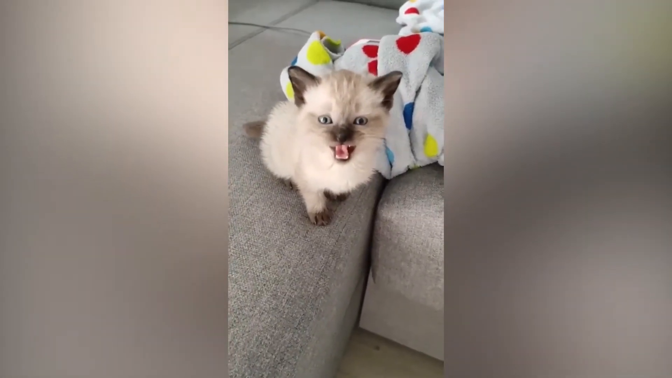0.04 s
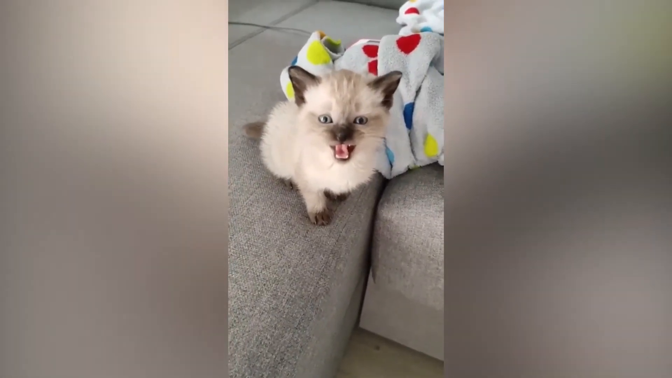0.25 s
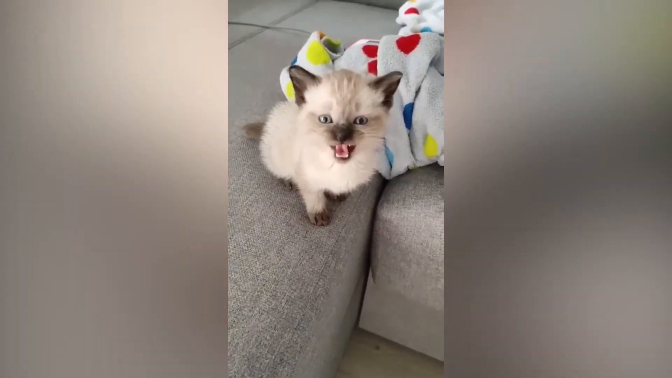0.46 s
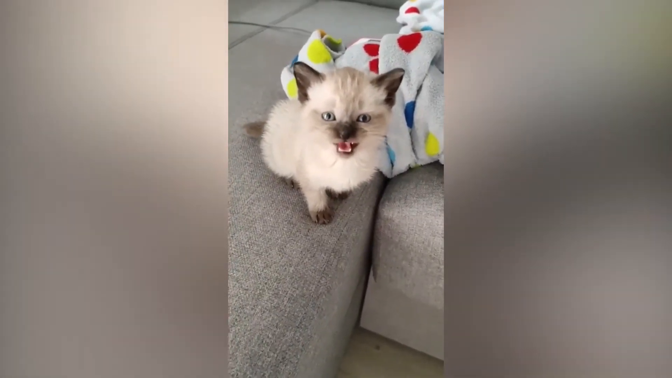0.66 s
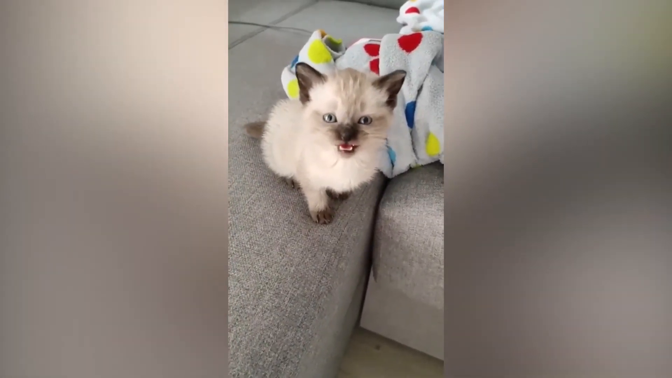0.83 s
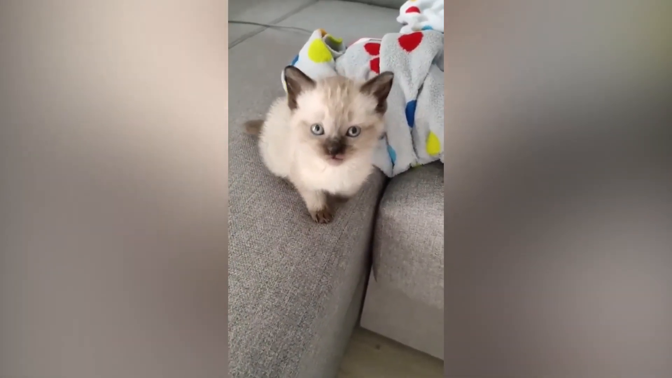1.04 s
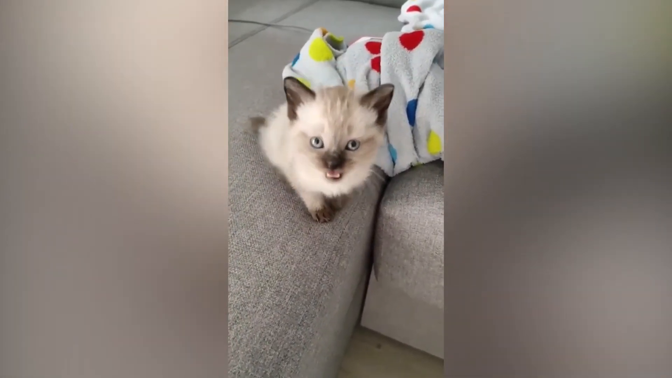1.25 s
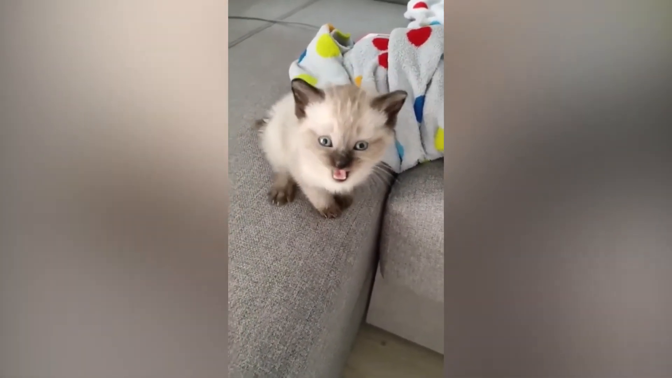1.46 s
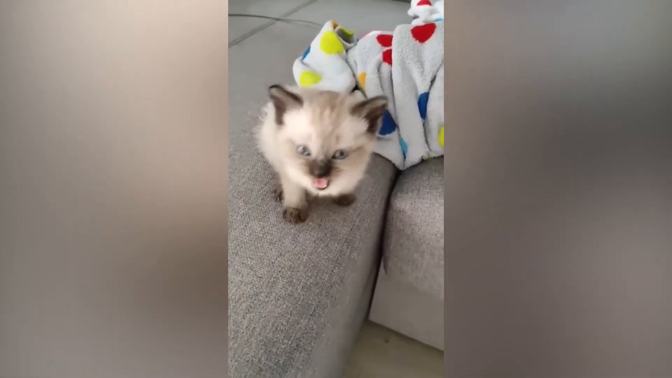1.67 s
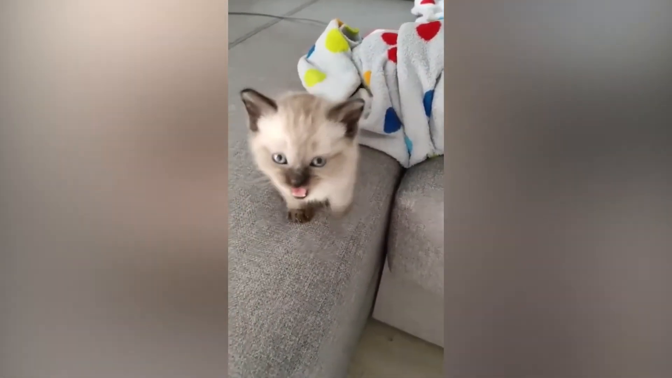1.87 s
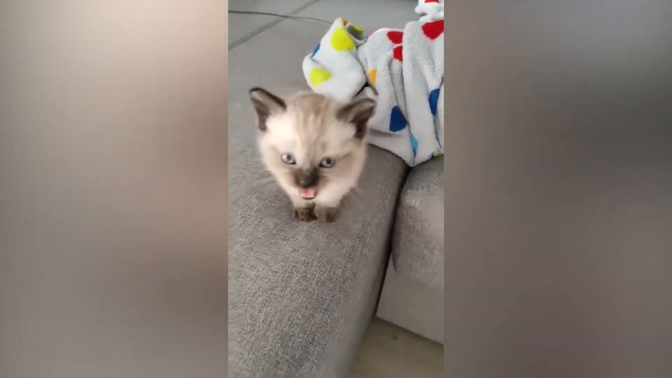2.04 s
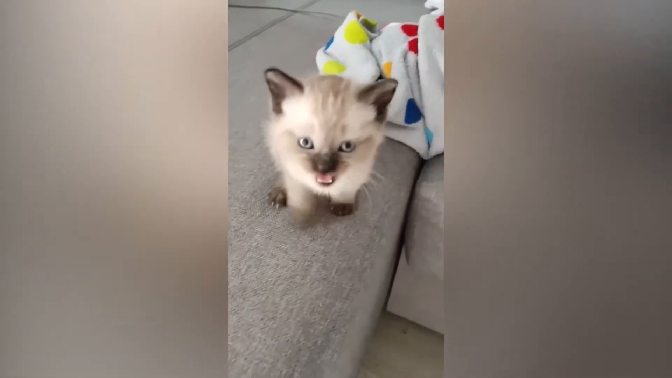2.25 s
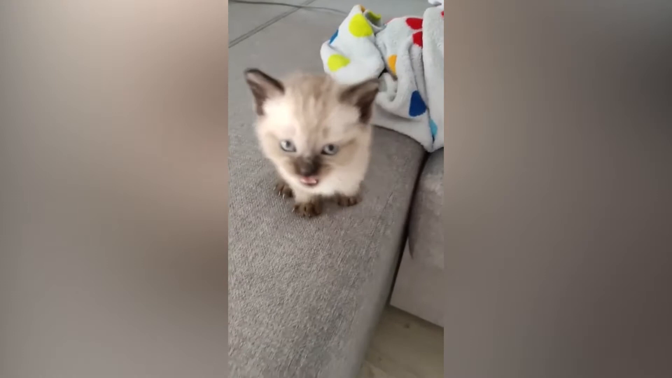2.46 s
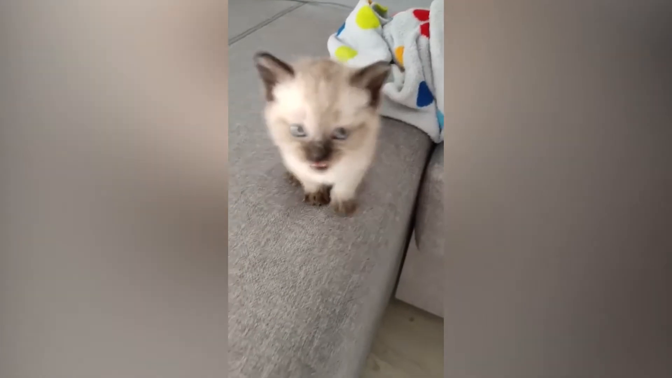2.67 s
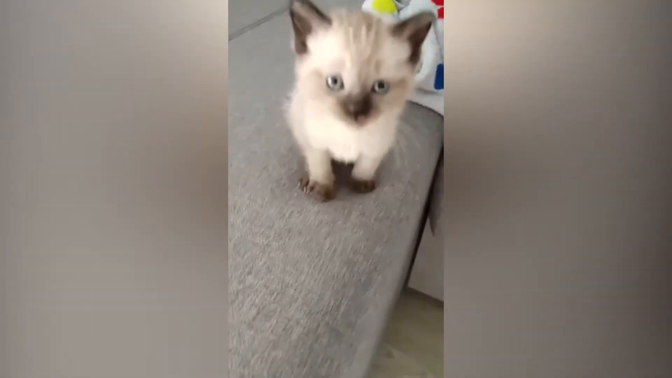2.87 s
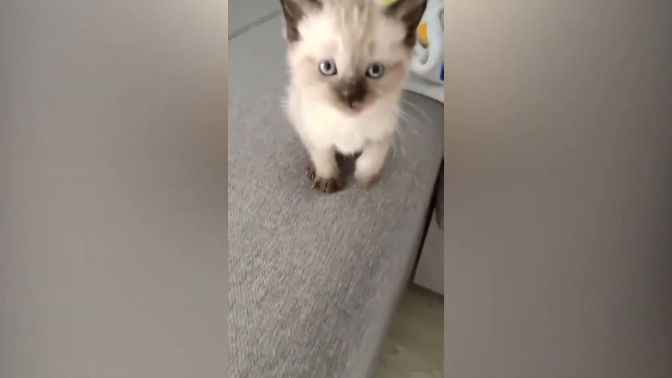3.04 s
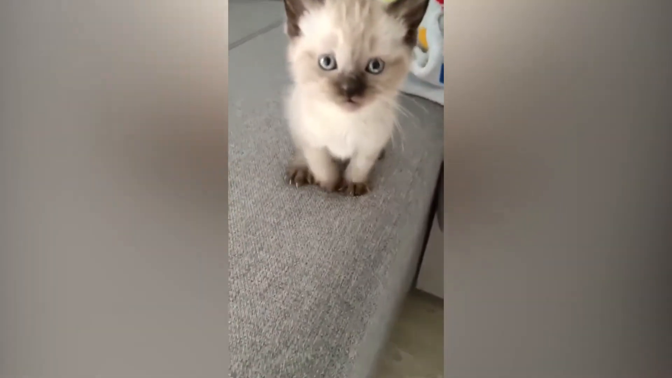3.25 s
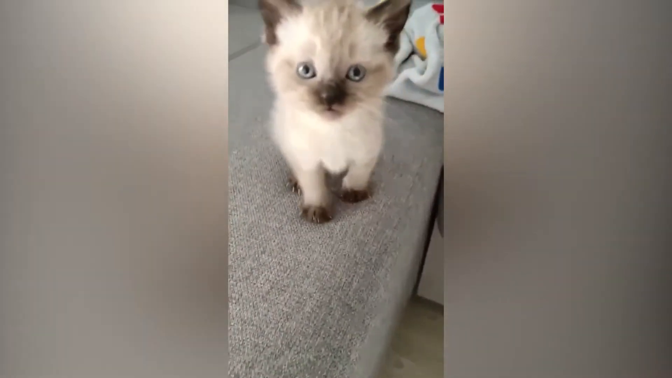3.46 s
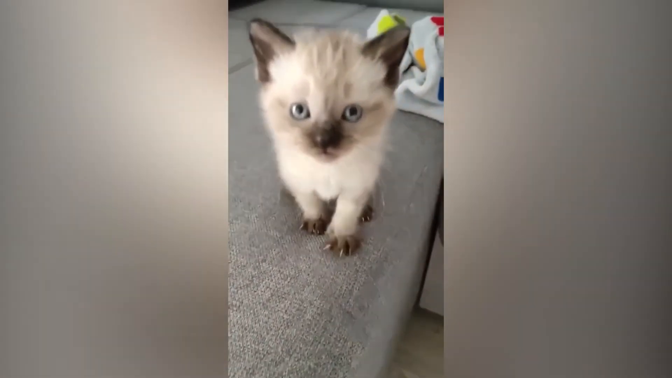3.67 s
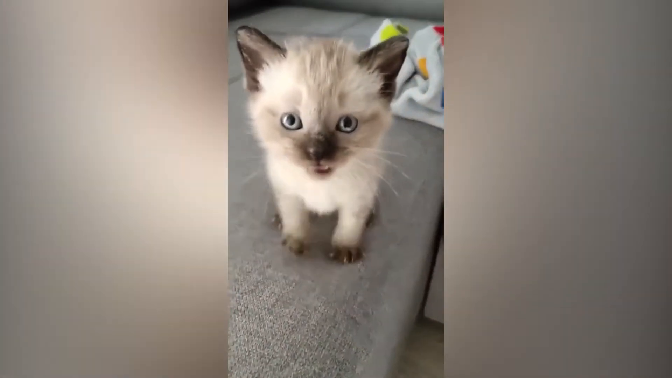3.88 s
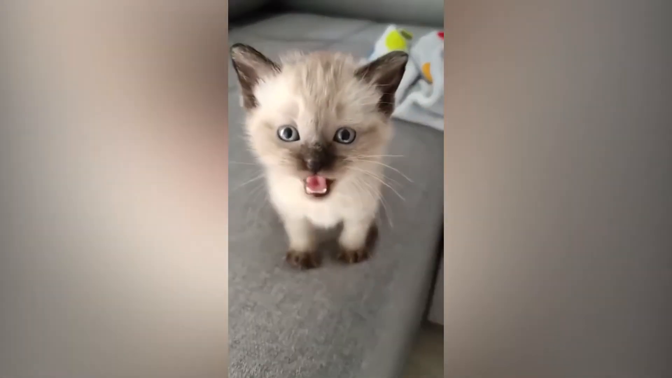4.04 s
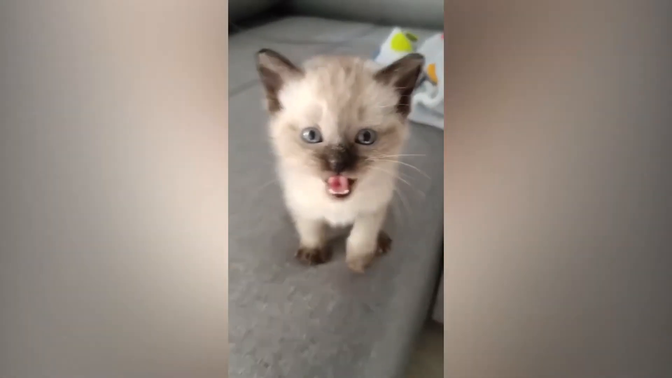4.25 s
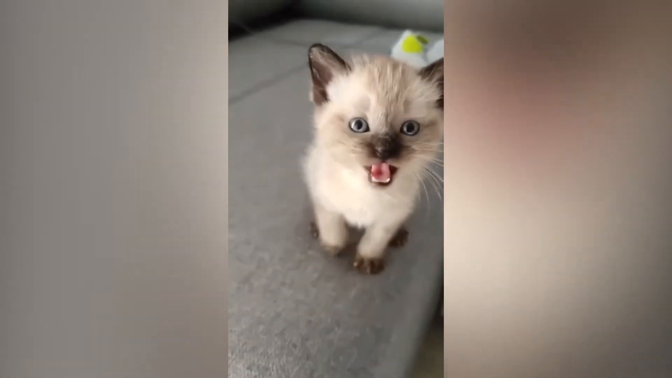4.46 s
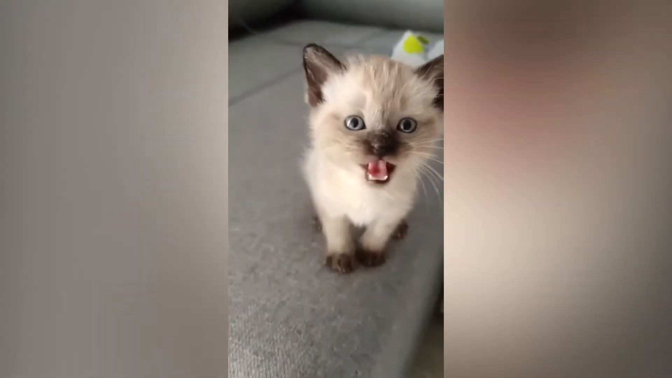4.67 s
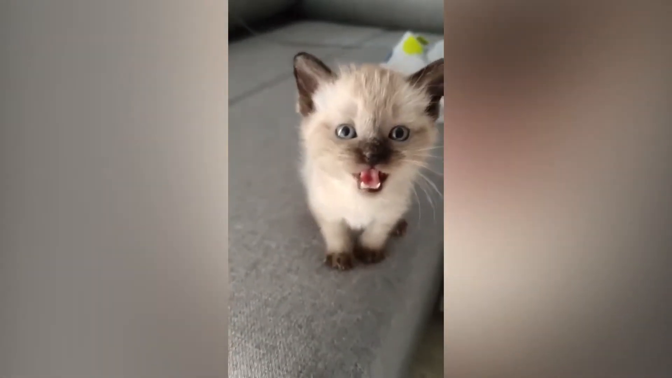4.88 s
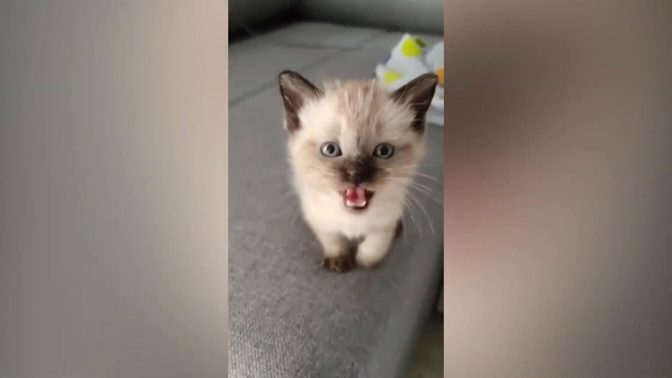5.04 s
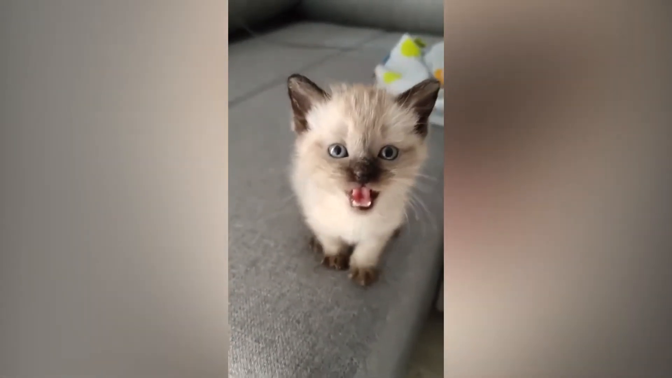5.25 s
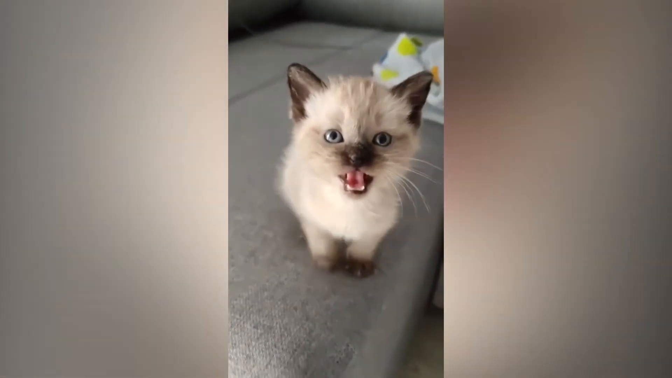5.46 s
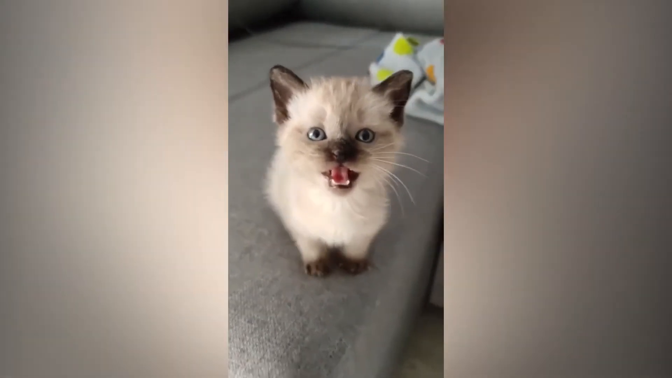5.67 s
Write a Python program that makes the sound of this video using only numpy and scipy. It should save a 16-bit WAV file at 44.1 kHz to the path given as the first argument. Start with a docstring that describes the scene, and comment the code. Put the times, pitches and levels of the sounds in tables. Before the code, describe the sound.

A small kitten meows close to the microphone in a quiet living room, with a faint low rumble and slight reverberation. The first meow is already under way at the start, a soft, drawn-out call that lifts a little in pitch around 1.2 seconds and then slowly sinks and weakens. It turns hoarse and raspy from about 2 to 2.8 seconds, clears briefly, and dies in a tiny creak at 3.4 seconds. Only room tone fills the short pause. At about 4.1 seconds the second meow begins with a brief rasp, then becomes higher and cleaner than the first. It rises gently and swells, loudest from around 4.9 seconds, and carries on to the end at about 5.7 seconds. Two faint, thin, flickering high tones accompany it, from 4.2 to 4.5 seconds and, slightly lower, from 4.8 to 5.2 seconds.

```python
"""A small kitten on a sofa gives two long meows, close by, over the tone of a quiet living room.
The first, already under way, sinks in pitch, turns hoarse and dies in a creak as the folds go slack.
The second is higher, louder and cleaner, with two thin, flickering tones near 4 kHz alongside it.
Both meows follow the source-filter principle: the vocal folds buzz and chop the breath, the throat
and open mouth resonate, and the room adds a faint reverberation."""
import sys
import numpy as np
from scipy import signal
from scipy.fft import rfft, irfft
from scipy.io import wavfile

SR = 44100
rng = np.random.default_rng(int(sys.argv[2]) if len(sys.argv) > 2 else 0)


def digitize_waveform(pressure):
    """Quantize a signal to 16-bit integers and store it at the path in sys.argv[1].

    Rows of a 2-D input are taken as channels; values are limited to [-1, 1].
    """
    field = np.atleast_2d(pressure).T
    bounded = np.clip(field, -1, 1)
    quanta = np.round(bounded * 32767).astype(np.int16)
    wavfile.write(sys.argv[1], SR, quanta)


N = 251811
STEP = 32   # samples per tick of the control clock
TIME = np.arange(N) / SR
TICKS = TIME[::STEP]
CUTOFF_HZ = 7800


def from_db(db):
    return 10 ** (np.asarray(db) / 20)


def rms_one(x):
    return x / np.sqrt(np.mean(x ** 2) + 1e-20)


def control_curve(points):
    return np.interp(TICKS, *np.transpose(points))


def audio_rate(control):
    return np.interp(TIME, TICKS, control)


def gain_at(spectrum, hz):
    points_hz, levels_db = np.transpose(spectrum)
    return from_db(np.interp(np.log(hz), np.log(points_hz), levels_db))


def drift(rate_hz, count=1):
    """Low-passed noise: rows of smooth random motion on the control clock, rms 1."""
    pole = np.exp(-2 * np.pi * rate_hz * STEP / SR)
    white = rng.standard_normal((count, 2 * len(TICKS)))
    slow = signal.lfilter([1], [1, -2 * pole, pole * pole], white)
    return rms_one(slow[:, len(TICKS):])


def coloured(noise, spectrum):
    """Spectral shaping: noise takes on the given envelope, rms 1."""
    hz = np.maximum(np.arange(N // 2 + 1) * SR / N, 1)
    return rms_one(irfft(rfft(noise) * gain_at(spectrum, hz), N))


# Background spectrum: frequency_hz, relative_density_db
ROOM_SPECTRUM = [(10, -1), (20, -12.5), (38, -19), (100, -24), (213, -26.5), (450, -32), (1150, -36.5),
                 (2100, -41), (3900, -42.5), (4500, -51), (5500, -42.5), (7000, -48), (7800, -54)]
def room_tone(level_db=-68.5):
    """Stationary noise: a faint rumble, strongest in the bass."""
    return from_db(level_db) * coloured(rng.standard_normal(N), ROOM_SPECTRUM)


def reverberation(sound, t60_s=0.63, level_db=-11):
    """Diffuse reflection: echoes from walls and furniture decay exponentially."""
    t = TIME[:SR // 2]
    tail = rng.standard_normal(len(t)) * from_db(-60 * t / t60_s) * (t > .004)
    return from_db(level_db) * signal.fftconvolve(sound, tail / np.linalg.norm(tail))[:N]


# Thin tones sounding alongside the second meow: start_s, end_s, pitch_hz, level_db
THIN_TONES = [(4.165, 4.52, 4196, -61.5), (4.773, 5.162, 3946, -58)]
def thin_tone(start_s, end_s, pitch_hz, level_db):
    """Amplitude modulation: a sine of steady pitch flickers in level."""
    gate = np.clip(np.minimum(TICKS - start_s, end_s - TICKS) / 0.02, 0, 1)
    envelope = gate * from_db(level_db + 3.8 * drift(36)[0])
    return audio_rate(envelope) * np.sin(2 * np.pi * pitch_hz * TIME)


# Last closures of the folds: time_s, strength_db
FOLD_SLAPS = [(3.3727, -53.5), (3.3805, -54), (3.395, -57)]
# Throat resonances: frequency_hz, gain_db, t60_s
THROAT_MODES = [(230, -5, 0.053), (1660, 3, .005), (2950, 17.5, 0.006), (3750, -16, 0.0057)]
def creak(closing_s=0.00072):
    """Impulse response: each soft slap of the slack folds rings the damped modes of the throat."""
    t = TIME[:SR // 20]
    ring = sum(from_db(db - 60 * t / t60) * np.sin(2 * np.pi * hz * t) for hz, db, t60 in THROAT_MODES)
    slaps = np.zeros(N)
    for time_s, strength_db in FOLD_SLAPS:
        slaps[round(time_s * SR)] = from_db(strength_db)
    return signal.fftconvolve(slaps, ring * (1 - np.exp(-t / closing_s)))[:N]


def mouth_rasp(centre_hz, width_hz=510):
    """Narrow-band noise: turbulence rings in the moving resonance of the mouth."""
    angle = 2 * np.pi * np.cumsum(audio_rate(centre_hz)) / SR
    in_phase, quadrature = drift(width_hz, count=2)
    return audio_rate(in_phase) * np.cos(angle) + audio_rate(quadrature) * np.sin(angle)


# Turbulence at the folds, per meow: frequency_hz, relative_density_db
BREATH_SPECTRA = [
    [(200, -31.5), (700, -26), (1200, -38), (1500, -24), (1800, -1), (2200, -1.5), (2500, -4.5),
     (3000, -5.5), (3600, -4.5), (4100, -11), (4600, -27.5), (5800, -23.5), (6600, -23.5), (8000, -57.5)],
    [(200, -27), (1200, -21), (1600, -20), (2000, -27), (2500, -22.5), (2900, -7), (3600, -0.5), (4100, -8),
     (4600, -28), (5800, -28.5), (6400, -39.5), (8000, -47)],
]
def throat_rasp(which, phase):
    """Modulated turbulence: air rushes through the folds once in every cycle."""
    puffs = rng.standard_normal(N) * (1 + 1.4 * np.cos(phase))
    return coloured(puffs, BREATH_SPECTRA[which])


def band(gains, hz, low_hz, high_hz, level_db):
    """Power normalisation: the partials between two steep borders share one total level."""
    weights = gains / np.sqrt((1 + (low_hz / hz) ** 60) * (1 + (hz / high_hz) ** 60))
    return weights / np.sqrt(np.sum(weights ** 2, axis=0) + 1e-12) * from_db(level_db)


def partials(sizes, phase, flutter_db, shift_hz=0):
    """Superposition: sinusoids one pitch apart add up, each fluttering in strength."""
    sizes = sizes * from_db(flutter_db * drift(33, count=len(sizes)))
    smear = rng.normal(0, 1.59, len(sizes))   # the tract smears each pulse
    live = slice(*np.flatnonzero(audio_rate(sizes.sum(axis=0)))[[0, -1]])
    tone = np.zeros(N)
    for k, size in enumerate(sizes):
        angle = (k + 1) * phase[live] + 2 * np.pi * shift_hz * TIME[live] + smear[k]
        tone[live] += np.sqrt(2) * audio_rate(size)[live] * np.cos(angle)
    return tone


# Envelope of the shrill partials, per meow: frequency_hz, relative_gain_db
SHRILL_SPECTRA = [
    [(3250, -22.5), (3450, 6), (3600, -5), (3780, 4.5), (4100, -6.5), (4450, -18), (4750, -24),
     (5050, -13.5), (5400, -15.5), (5750, -8.5), (6150, -27), (6450, -14), (6800, -53), (7800, -52)],
    [(3300, -5.5), (3600, 18.5), (3750, -13.5), (4100, 0), (4300, -21), (4550, -32.5), (5000, -22.5),
     (5450, -26.5), (5900, -22), (6250, -42.5), (6650, -32), (7100, -35.5), (7500, -50)],
]
def shrill_partials(which, harmonic_hz, phase, clear, shrill_db, sheen_db, shift_hz=2757):
    """Frequency shift: shrill partials above 3 kHz glide with the pitch but lie off its harmonic series."""
    hz = harmonic_hz + shift_hz
    gains = gain_at(SHRILL_SPECTRA[which], hz)
    sizes = band(gains, hz, 3300, 4500, shrill_db) + band(gains, hz, 4500, CUTOFF_HZ, sheen_db)
    return partials(sizes * clear, phase, flutter_db=1.6, shift_hz=shift_hz)


# Vocal tract response, per meow: frequency_hz, relative_gain_db
TRACT_RESPONSES = [
    [(250, -8.5), (400, -14), (660, -11.5), (1000, -3.5), (1200, -14), (1400, -8), (1650, -7), (1950, -6.5),
     (2260, -0.5), (2550, -6.5), (3050, 0), (3250, -7.5), (3500, -22)],
    [(400, -21), (880, -8), (1250, -23), (1380, -10), (1600, -4), (1800, -4), (2000, -3), (2250, 4.5),
     (2450, -3.5), (2650, -7), (3100, -3), (3280, -4.5), (3500, -12.5)],
]
def vocal_tract(which, hz, mouth_hz, width_hz, chest_db, mouth_db, throat_db):
    """Formant filtering: the tract and the moving mouth resonance set each harmonic's amplitude."""
    tract = gain_at(TRACT_RESPONSES[which], hz)
    resonance = 1 / np.sqrt(1 + (2 * (hz - mouth_hz) / width_hz) ** 2)
    return (band(tract, hz, 100, 1400, chest_db)
            + band(tract * resonance, hz, 1400, 2520, mouth_db)
            + band(tract, hz, 2520, 3300, throat_db))


# Chest, throat, shrill and sheen bands, per meow: usual_level_db, db_per_effort_db, db_per_octave
BAND_SLOPES = [
    [(-69, -0.16, 5), (-56, 0.27, 18.5), (-64, 0.92, 12), (-76.5, 0.22, 14.5)],
    [(-63, 0.3, 32), (-46, 0.25, -4), (-52.5, -0.36, 12), (-70.5, 0.23, 30.5)],
]
def band_levels(which, start_s, extra_effort_db, octaves, opening_s=0.039, tremble_db=1.55):
    """Spectral balance: four bands open after the mouth, follow effort and pitch, and waver."""
    opening_db = -15 * np.exp(-np.maximum(TICKS - start_s, 0) ** 2 / opening_s ** 2)
    return [db + opening_db + per_db * extra_effort_db + per_octave * octaves + tremble_db * drift(5.3)[0]
            for db, per_db, per_octave in BAND_SLOPES[which]]


def vocal_folds(pitch_hz, hoarse, quiver=.0019, jitter=.022, shimmer=.55):
    """Jitter and shimmer: hoarse folds vary in period and strength from cycle to cycle."""
    wobble = quiver * drift(25)[0] + jitter * hoarse * drift(180)[0]
    cycles = np.cumsum(audio_rate(pitch_hz * (1 + wobble))) / SR
    per_cycle = rng.standard_normal(len(TICKS))
    unevenness = np.interp(cycles, np.arange(len(per_cycle)), per_cycle)
    strength = 1 + shimmer * audio_rate(hoarse ** 2.8) * unevenness
    return 2 * np.pi * cycles, strength


# Fundamental of the folds in each meow: time_s, pitch_hz
FIRST_PITCH = [(0.0, 349.4), (0.07, 343.8), (0.25, 338.3), (0.63, 330.6), (0.94, 345.3), (1.23, 382.8),
               (1.36, 380.6), (1.42, 373.6), (1.45, 373.8), (1.7, 331.8), (1.8, 327.2), (2.1, 324.2),
               (2.17, 323.7), (2.42, 296.3), (2.47, 274.5), (2.53, 305.2), (2.6, 284.8), (2.62, 273.7),
               (2.7, 275.2), (2.75, 283.0), (2.78, 269.8), (2.91, 275.2), (2.97, 266.3), (3.27, 259),
               (3.34, 249), (3.4, 225.6)]
SECOND_PITCH = [(4.14, 337.5), (4.174, 368.8), (4.2, 394.4), (4.274, 396.2), (4.354, 403), (4.402, 396),
                (4.428, 404.5), (4.48, 400.3), (4.55, 423.5), (4.664, 432.6), (4.734, 436.1),
                (4.816, 443.8), (5.04, 448), (5.258, 465.3), (5.332, 454.6), (5.402, 433.3), (5.52, 427.4),
                (5.71, 447.4)]
# Vocal effort, per meow: time_s, level_db
EFFORT_CURVES = [
    [(0.0, -46), (0.2, -44.5), (0.49, -49), (0.73, -46), (0.78, -48), (1.03, -48), (1.06, -44.5),
     (1.33, -50), (1.49, -48.5), (1.59, -54), (1.78, -52.5), (1.83, -54.5), (2.19, -52.5), (2.2, -49.5),
     (2.58, -56.5), (2.71, -52.5), (2.76, -61), (2.77, -52.5), (3.09, -63), (3.21, -57), (3.38, -65.5),
     (3.41, -62)],
    [(4.142, -49), (4.18, -50), (4.386, -48.5), (4.666, -46), (4.884, -40.5), (5.106, -40), (5.29, -42),
     (5.442, -41.5), (5.71, -41)],
]
# Mouth resonance, held by the jaw near harmonic five or six, per meow: time_s, pitch_multiple
JAW_TUNING = [
    [(0, 6.2), (.9, 6.2), (1.7, 5.3), (2.05, 5.3), (2.22, 6.2), (2.95, 5.9), (3.25, 6.2), (3.41, 7.4)],
    [(4.18, 5), (4.23, 5.8), (4.55, 5.7), (4.7, 5)],
]
# Hoarseness, per meow: time_s, hoarse_to_clear_db
HOARSENESS = [
    [(0, -21), (1.25, -17), (1.9, -9), (2.18, -8), (2.32, -1), (2.58, -1), (2.67, -7), (2.745, 0),
     (2.82, -13), (3.08, -28), (3.28, -17), (3.38, 2)],
    [(4.14, 3), (4.18, -2), (4.23, -22), (4.43, -27), (4.55, -16), (4.95, -24), (5.1, -20), (5.22, -28),
     (5.45, -23)],
]
# The two calls: start_s, end_s, usual_effort_db, usual_pitch_hz
CALLS = [(-.3, 3.415, -51, 330), (4.14, 5.8, -42, 430)]
def meow(which, mouth_width_hz, mouth_rasp_db, throat_rasp_db):
    """Source and filter: fold pulses and the turbulence they chop are shaped by throat and mouth."""
    start_s, end_s, usual_db, usual_hz = CALLS[which]
    pitch_hz = control_curve([FIRST_PITCH, SECOND_PITCH][which])
    effort_db = control_curve(EFFORT_CURVES[which])
    mouth_hz = control_curve(JAW_TUNING[which]) * pitch_hz
    octaves = np.log2(pitch_hz / usual_hz)
    chest_db, throat_db, shrill_db, sheen_db = band_levels(which, start_s, effort_db - usual_db, octaves)
    voiced = np.clip((TICKS - start_s) / .008 + 1, 0, 1) * np.clip((end_s - TICKS) / .015, 0, 1)
    # the clear tone gives way as hoarseness grows
    ratio = from_db(control_curve(HOARSENESS[which]))
    hoarse = ratio / np.sqrt(1 + ratio ** 2)
    clear = voiced * np.sqrt(1 - hoarse ** 2)

    phase, strength = vocal_folds(pitch_hz, hoarse)
    harmonic_hz = np.arange(1, 18)[:, None] * pitch_hz
    mouth_db = effort_db + 0.3
    sizes = vocal_tract(which, harmonic_hz, mouth_hz, mouth_width_hz, chest_db, mouth_db, throat_db)
    tone = partials(sizes * clear, phase, flutter_db=.45 + 4 * hoarse)
    tone += shrill_partials(which, harmonic_hz, phase, clear, shrill_db, sheen_db)

    treble = np.hypot(from_db(throat_db), from_db(shrill_db))
    rasp = throat_rasp(which, phase) * audio_rate(from_db(throat_rasp_db) * treble)
    rasp += mouth_rasp(mouth_hz) * audio_rate(from_db(effort_db + mouth_rasp_db) * hoarse)
    return strength * tone + rasp * audio_rate(hoarse * voiced)


def scene():
    """Superposition: the direct sound, its reflections and the room tone add."""
    first = meow(which=0, mouth_width_hz=190, mouth_rasp_db=-6, throat_rasp_db=2)
    second = meow(which=1, mouth_width_hz=283, mouth_rasp_db=-16, throat_rasp_db=5)
    direct = first + creak() + second + sum(thin_tone(*row) for row in THIN_TONES)
    return (room_tone() + reverberation(direct) + direct)[None]


def record(dry):
    """Band limiting: an elliptic low-pass cuts the top steeply."""
    return signal.sosfilt(signal.ellip(10, .1, 70, CUTOFF_HZ, fs=SR, output="sos"), dry)


dry = scene()
out = record(dry)
digitize_waveform(out)
```